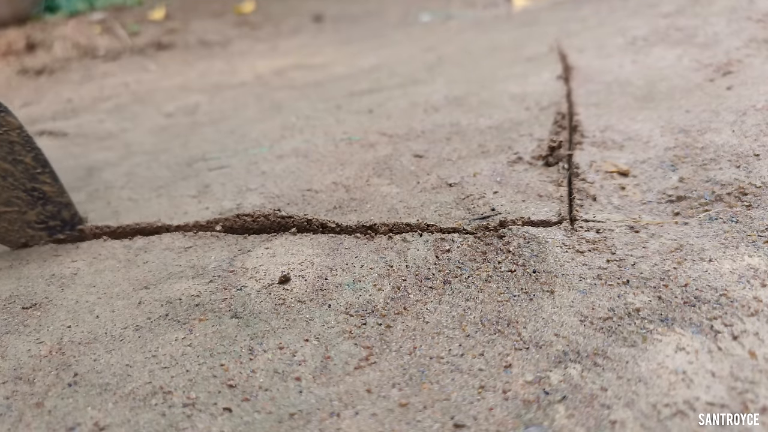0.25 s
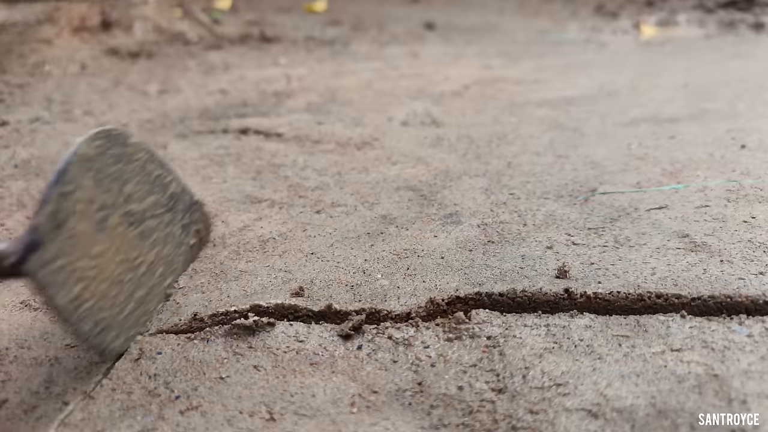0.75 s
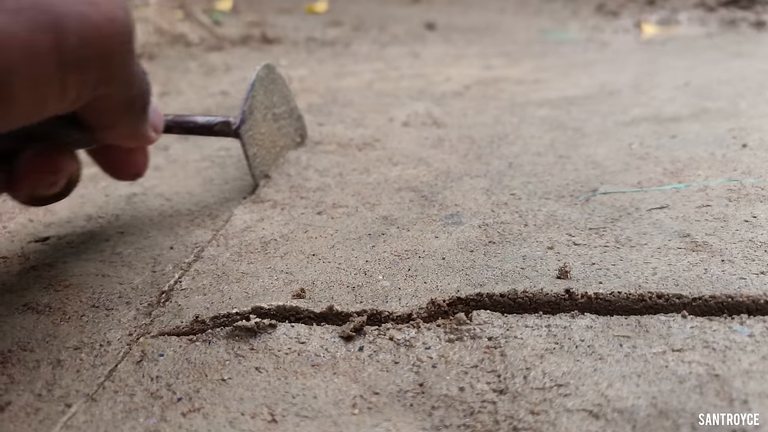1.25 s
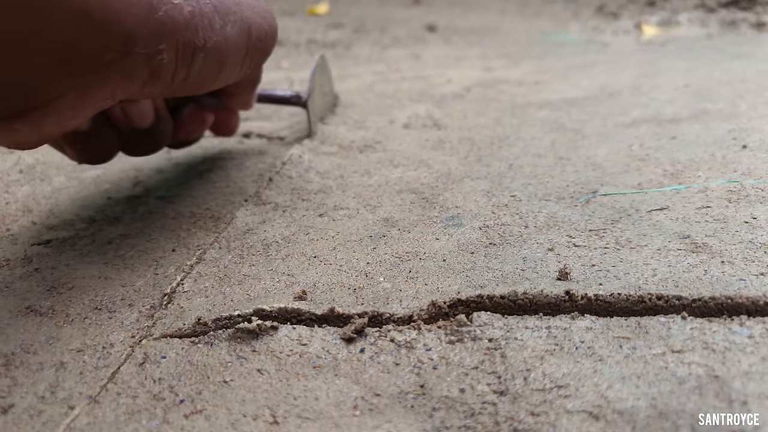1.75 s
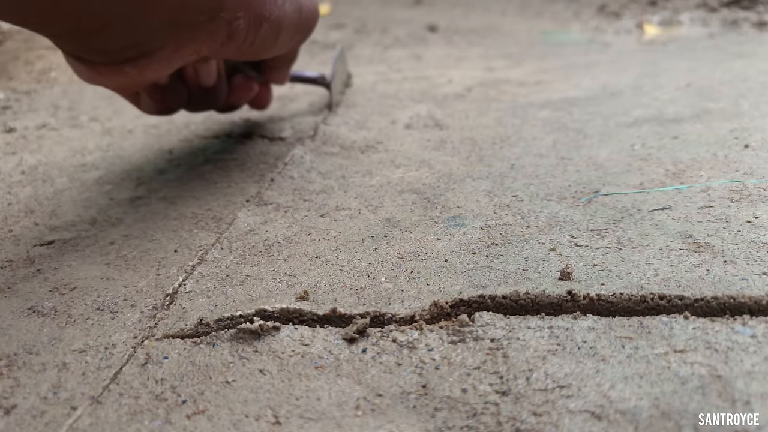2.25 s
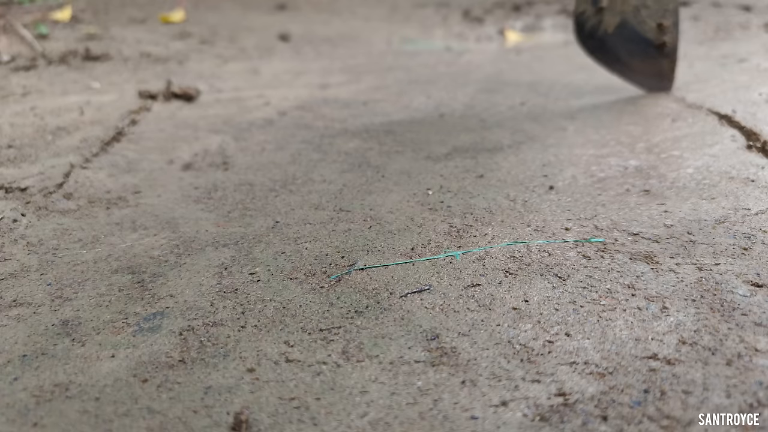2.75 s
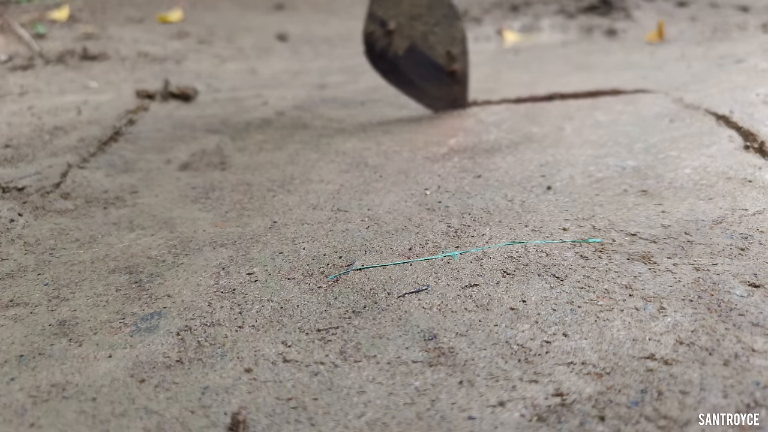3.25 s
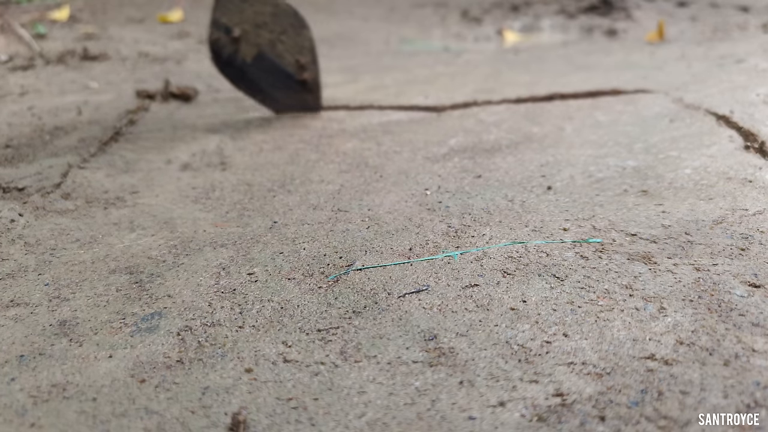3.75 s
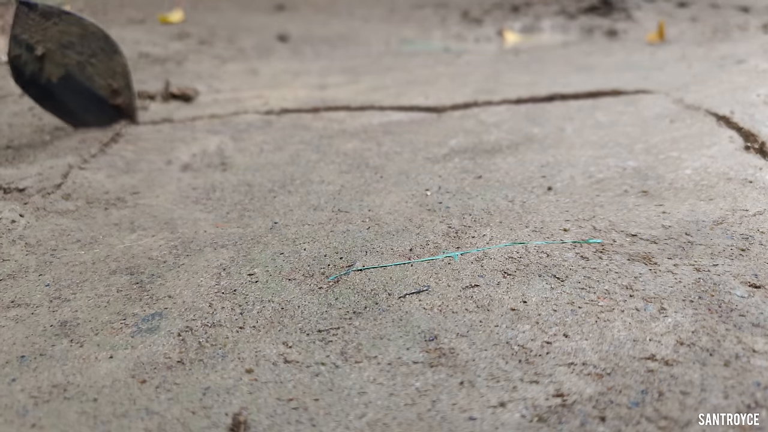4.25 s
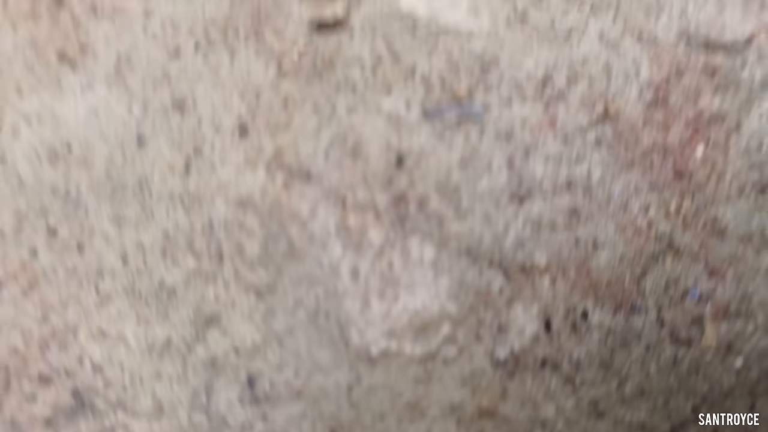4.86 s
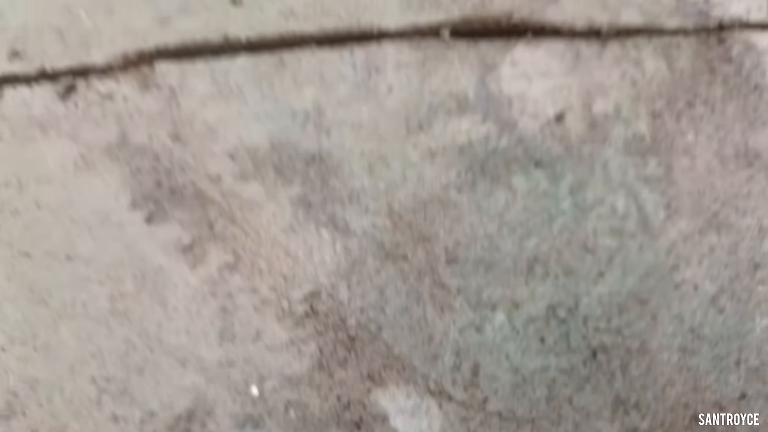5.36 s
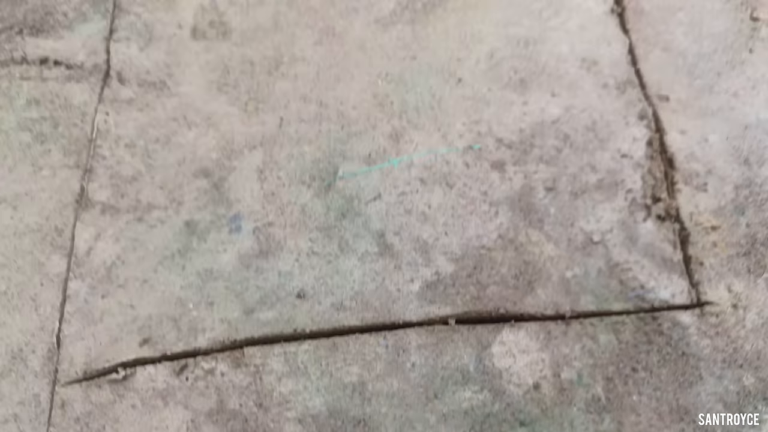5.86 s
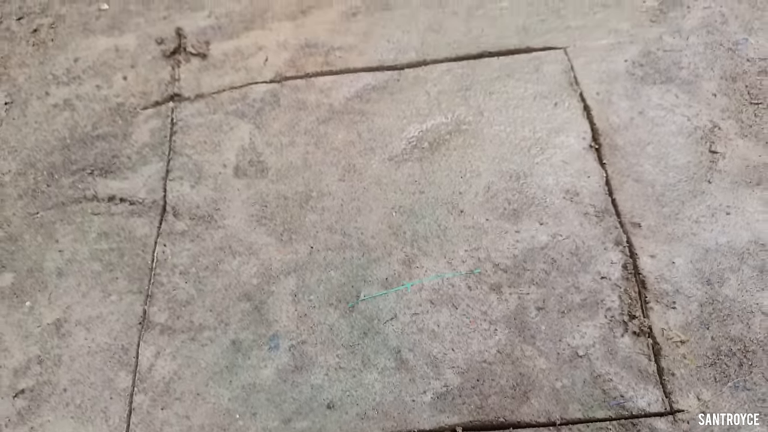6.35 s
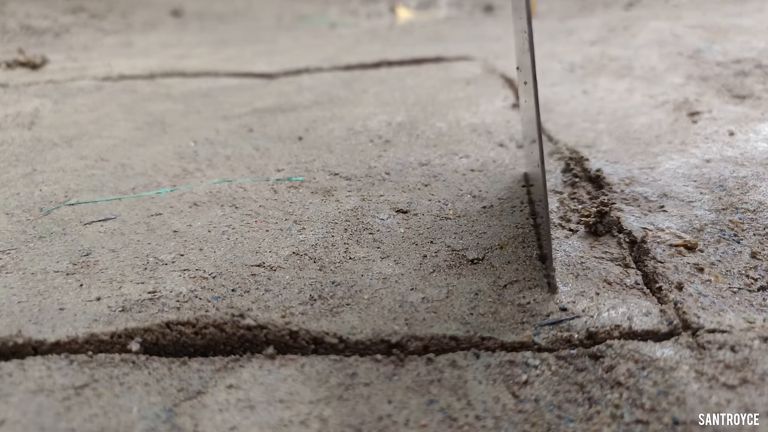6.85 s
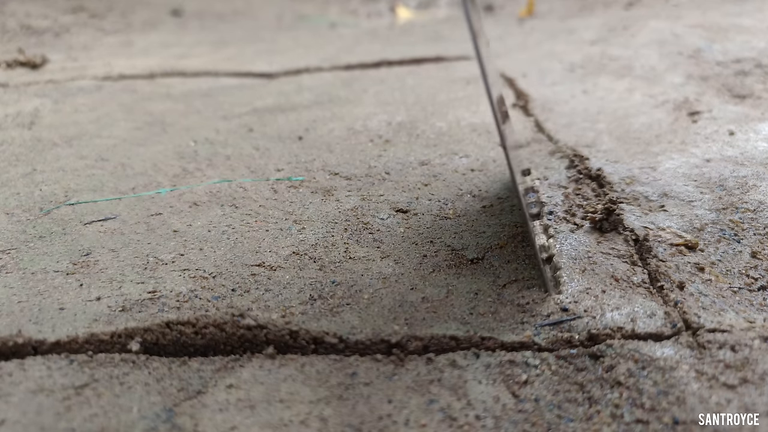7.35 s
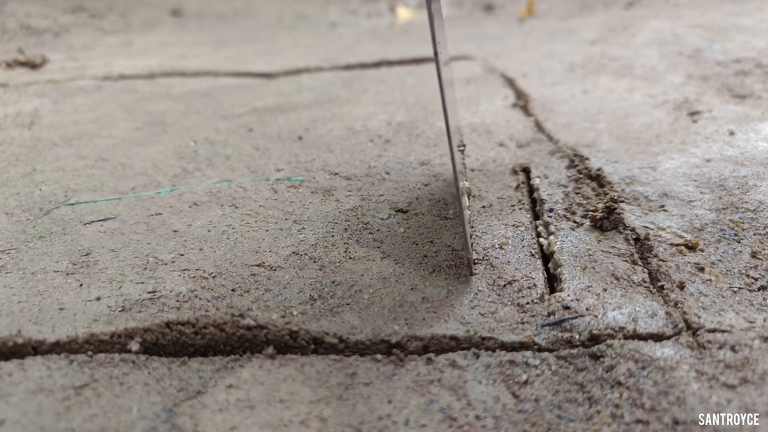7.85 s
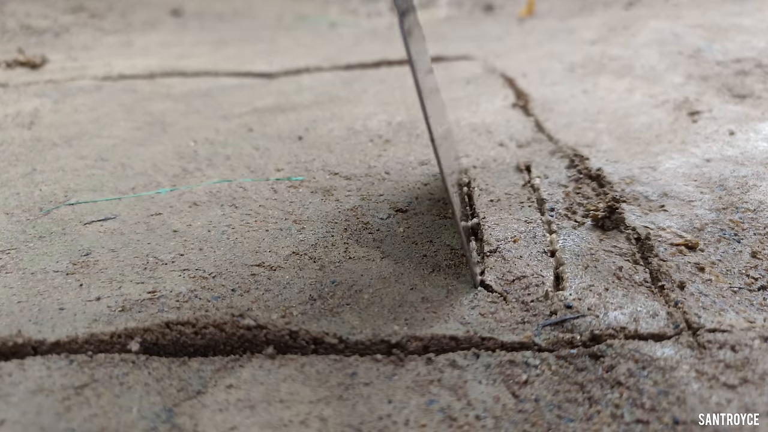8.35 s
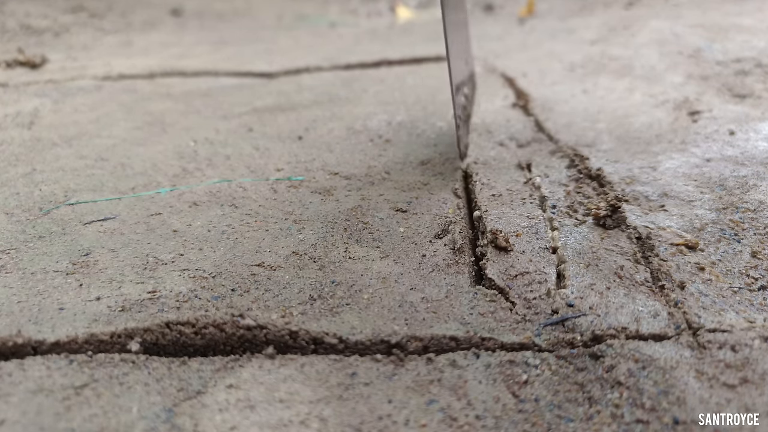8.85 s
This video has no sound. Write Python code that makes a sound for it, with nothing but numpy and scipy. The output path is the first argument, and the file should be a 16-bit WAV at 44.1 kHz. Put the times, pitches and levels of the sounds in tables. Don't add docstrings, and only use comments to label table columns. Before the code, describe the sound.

Steel blade drags gritty cuts through damp sand, pebbles snapping, then a knife taps crunchily while a songbird buzzes and trills.

```python
import sys
import numpy as np
from scipy import signal
from scipy.fft import rfft, irfft
from scipy.io import wavfile
from scipy.ndimage import uniform_filter1d, map_coordinates

SR = 44100
rng = np.random.default_rng(int(sys.argv[2]) if len(sys.argv) > 2 else 0)


def magnitude_from_level(level_db):
    exponent = np.asarray(level_db, float) / 20
    return 10 ** exponent


def master(y):
    cut = np.clip(np.atleast_2d(y).T, -1, 1)
    pcm = np.round(cut * 32767)
    wavfile.write(sys.argv[1], SR, pcm.astype(np.int16))


N = 401310
T = np.arange(N) / SR
HZ = np.fft.rfftfreq(N, 1 / SR)
SIDES = np.array([[.5], [-.5]])

# frequency in Hz, density in dB per Hz.
YARD_COLOUR = [(15, -45.5), (25, -11.5), (81, 4), (170, -4), (248, 2), (292, -6.5), (345, -8), (637, -14),
               (763, -6.5), (900, -27), (1170, -46), (1980, -120)]
# frequency in Hz, density in dB per Hz.
GARDEN_COLOUR = [(15, -27.5), (25, -4), (38, -19.5), (114, -4), (181, -4), (324, -1.5), (692, -8.5),
                 (766, -12), (1040, -15.5), (3250, -21), (4300, -16), (5260, -22.5), (7130, -18),
                 (8300, -24.5), (10700, -28.5), (13900, -63.5), (22000, -120)]
# time in seconds, level
# in dB.
INSECT_CHOIR = [(4.51, -56.5), (4.86, -32.5), (6.89, -40.5), (7.46, -39.5), (8.2, -23), (8.75, -40),
                (9.03, -61)]
# last pulse in seconds, number of pulses, level in dB.
CRICKET_CHIRPS = [(4.51, 1, -33), (6.4093, 3, -32), (6.8037, 3, -33), (6.99, 2, -33.5), (7.233, 2, -36.5),
                  (7.4759, 3, -33.5)]
# start in seconds, length in seconds, pitch in Hz, level in dB.
HELD_WHISTLES = [(7.17, .125, 1950, -48), (7.29, .06, 2010, -48), (7.36, .19, 1980, -46.5),
                 (7.555, .055, 1980, -50), (6.33, .29, 1700, -54.5), (7.925, .016, 1000, -45),
                 (8.162, .016, 1000, -47), (8.455, .016, 1000, -46), (8.778, .016, 950, -45)]
# start in seconds, length in seconds, top pitch in Hz, level in dB.
RISING_WHISTLES = [(7.055, .08, 2400, -53), (7.675, .08, 2350, -50), (7.982, .08, 2380, -51),
                   (8.28, .078, 2350, -52), (8.555, .123, 3300, -46.5), (8.795, .118, 3300, -48.5)]
# time in seconds, level in dB, centre pitch in Hz.
BIRD_BUZZ = [
    (4.585, -49, 4720),
    (4.804, -14.5, 4700),
    (4.897, -10, 4736),
    (5.017, -11, 4734),
    (5.049, -37, 4750),
]
# time in milliseconds, pitch in Hz, level in dB.
SWOOP_NOTES = [
    [(-8, 5250, -36), (-.5, 5760, -16), (4, 5910, -18.5), (8, 5980, -31)],
    [(12.5, 4300, -30), (14.5, 4040, -15.5), (19, 3640, -10), (25, 3350, -14), (30, 3230, -18),
     (35, 3150, -22), (45, 2860, -35), (58, 2540, -38), (74, 2420, -43)],
    [(74, 2420, -43), (83, 2720, -37), (88, 3180, -27), (93, 3420, -18), (103, 3730, -10.5),
     (113, 3930, -12.5), (119, 4130, -8.5), (129, 4620, -7), (137, 4990, -11.5), (140.5, 5100, -32)],
]
# time in milliseconds, pitch in Hz, level in dB.
CHIP_NOTES = [
    [(-13, 3300, -38), (-8, 3540, -19), (-3, 3620, -14), (1, 3500, -12), (6, 2880, -36)],
    [(3.5, 4050, -30), (6, 4180, -15), (12, 4440, -10.5), (19, 4830, -6.5), (22.5, 5350, -15),
     (25, 5650, -21), (30, 5800, -30)],
    [(24, 4550, -30), (28, 4280, -12), (32, 4170, -7.5), (39, 4060, -10), (44, 3970, -18), (50, 3970, -16),
     (57, 4040, -19), (63, 4060, -36)],
    [(81, 7170, -40), (85, 7110, -26), (89, 7060, -21), (92, 6900, -25), (95, 6680, -42)],
]
# start in seconds, pace as a factor, effort in dB,
# gain from note to note in dB, lateness of the last note in milliseconds.
FIRST_TRILL = [(5.085, 0.99, -4.5, 1.5, .4), (5.26, 0.99, 0.1, -0.1, 1.4), (5.442, .99, 2.5, -1.5, -3.5),
               (5.619, 0.99, -2, 0.5, -1.5), (5.802, 0.98, -1, 0.65, -2.5), (5.987, .99, 1.5, -2, -5)]
# seconds, factor, dB, dB, milliseconds.
SECOND_TRILL = [(7.6345, 1, -9.5, 1.6, -3), (7.7752, 0.98, -1, 0.44, 1.5), (7.9146, 1.01, 0.5, -0.11, -.4),
                (8.055, 1, 1.6, -0.93, -.3), (8.1953, 1.02, 2.5, -1.15, -1.6),
                (8.3363, 1.006, 1.8, -0.75, 0), (8.478, 1.04, -0.4, -0.17, -0.5),
                (8.6208, 1.04, 0.2, -1.3, 3.5), (8.7711, 1.07, -2, -0.86, -1)]
# time in seconds, fine grit level in dB.
STROKE_PRESSURE = [
    [(0.0, -37.5), (0.116, -44.5), (0.41, -43), (0.46, -40), (0.664, -37), (0.716, -45)],
    [(0.73, -53.5), (0.83, -29), (0.986, -40), (1.216, -41.5), (1.302, -37.5), (1.804, -42), (2.212, -47.5),
     (2.518, -44.5), (2.533, -54)],
    [(2.87, -66.5), (2.96, -40.5), (3.337, -41), (3.649, -42.5), (3.691, -50), (3.905, -37.5), (4.061, -43),
     (4.389, -40), (4.41, -68)],
]
# coarse crunch in dB, blade body in dB (both relative to fine grit),
# drift of both along the stroke in dB, left minus right at the start in dB, the same at the end in dB.
STROKE_BALANCE = [
    (-10.5, -30.5, -3.5, 6.6, 5),
    (-7.5, -23.5, -2.5, 11.3, -2.5),
    (-6.5, -17, -9, 2.6, 2),
]
STROKE_BRIGHTEN = [0.19, 0.4, 0.14]
# frequency in Hz, density in dB per Hz.
STROKE_GRIT = [
    [(530, -40), (900, -25), (991, -28), (1200, -16), (1410, -29), (1770, -24), (2090, -26.5), (3070, -9),
     (4980, -20), (5890, -20.5), (10900, -3.5), (11800, -1.5), (16000, -10.5)],
    [(530, -29), (900, -27.5), (1460, -30.5), (1600, -26), (2330, -19.5), (3040, -17.5), (3910, -21),
     (6640, -11), (11000, -4), (12000, -2.5), (13800, -5), (15100, -1.5), (16000, -10.5)],
    [(530, -30), (900, -31.5), (1230, -15.5), (2500, -17), (3150, -7), (3770, -13.5), (5350, -18),
     (5890, -12), (6890, -15.5), (8250, -5.5), (10400, -7.5), (12000, -0.5), (16000, -10)],
]
# frequency in Hz, width in Hz, boost in dB.
PORT_PEAKS = [(8440, 1600, 2.5), (11980, 610, 7.5), (15400, 870, 7)]
# frequency in Hz, side minus mid in dB.
GRIT_WIDTH = [(60, -7), (110, -9), (200, -9), (380, -4), (700, 3.5), (1290, 4.5), (2380, -2.5),
              (4400, -2.5), (8120, 4.5), (15000, -1.5)]
# frequency in Hz, share to the left as a fraction.
GRIT_LEAN = [(100, 0.01), (300, -0.38), (1000, 0.012), (2400, -0.32), (4400, 0.01), (8000, -0.022),
             (12000, 0.67), (15000, 0.67)]
# from in Hz, to in Hz, peak in seconds,
# width in seconds, level in dB.
BLADE_TILTS = [(11300, 12700, 0.83, .035, 3.5), (8850, 11800, 1.84, 0.38, 0), (2930, 3450, 3.08, .2, -3),
               (2120, 2900, 0.805, 0.051, 5), (2180, 3330, 1.56, .45, -8), (8000, 9000, 3.55, .15, -0.5)]
# from in seconds, to in seconds, level in dB.
BLADE_RESTS = [
    (2.543, 2.878, -69.5),
    (4.406, 4.445, -62),
]
# peak in seconds, fine grit in dB, rise in seconds, fall in seconds.
KNIFE_RUBS = [(6.602, -70, .15, .05), (6.915, -65, .02, .01), (7.15, -68, .06, .01),
              (7.34, -67.5, .05, .01), (7.5, -57.5, .12, .1), (7.545, -49, .012, 0.11),
              (7.576, -49.5, 0.066, 0.02), (7.655, -54.5, .03, .07), (7.893, -43.5, .02, .025),
              (8.104, -62.5, 0.057, .01), (8.31, -60, .035, 0.009), (8.5, -56, 0.1, 0.23),
              (8.63, -48, 0.017, 0.084), (8.675, -60, .1, .02), (9.045, -64.5, 0.2, 0.11)]
# time in seconds, peak in dB, crunch in relative dB.
PEBBLE_SNAPS = [(0.2578, -26, -29), (0.2748, -32, -23), (0.347, -33.5, -18), (0.415, -27.5, -22),
                (0.5317, -37.5, -13), (0.7633, -32.5, -20), (0.7796, -36, -14), (0.798, -25.5, -12),
                (0.8185, -26, -16), (0.612, -26, -25), (0.837, -19.5, -23), (1.068, -35.5, -20),
                (1.243, -37, -17), (1.2933, -31.5, -21), (1.722, -30, -30), (1.731, -31, -30),
                (1.766, -30, -32), (1.821, -32, -30), (1.89, -34, -23), (3.21, -31, -20), (3.527, -35, -22),
                (1.759, -25, -43), (1.811, -24.5, -37), (2.6, -59, -8), (2.795, -52, -19),
                (2.9238, -34, -36), (3.014, -31.5, -14), (3.0854, -33.5, -1), (3.3438, -42, -14),
                (3.3752, -42, -19), (3.8277, -27, -26.5), (3.907, -26, -27.5), (4.14, -30, -30),
                (4.3086, -43, -19), (7.4806, -43, -23), (7.6453, -46, -20), (7.8914, -37, -20),
                (8.4856, -44, -8), (8.5226, -44.5, -17), (8.5954, -47, -20)]
# start in seconds, grit in dB, crunch in relative dB, body in relative dB,
# length in milliseconds.
CRUMBLING_CLODS = [(.6, -34.5, -25, -32, 22), (0.734, -40.5, -12, -26, 6.6), (.765, -53.5, 7.5, -13, 125),
                   (1.706, -30.5, -33, -35, 9.2), (2.879, -49, -17, -15, 22), (3.135, -38, -12, -20, 11),
                   (3.425, -30, -10.5, -16.5, 16)]
# start in seconds, length in milliseconds, pitch in Hz, level in dB.
STEEL_SQUEAKS = [(7.567, 14, 15300, -38), (7.558, 24, 12500, -43), (7.578, 12, 11350, -44),
                 (8.625, 30, 13800, -48.5), (8.63, 25, 11350, -53), (8.645, 18, 15450, -53)]
# time in seconds, extra path
SAND_BOUNCE = [(.7, 4.7), (.8, 2.95), (1.4, 2.53), (2.5, 3.2), (3.5, 3.98), (4.4, 8.1)]
# time in seconds, grit peak in dB, thud in relative dB,
# shatter length in milliseconds, crunch in relative dB.
KNIFE_TAPS = [
    (6.927, -8, -13.5, 11, -5),
    (7.1613, -2, -6.5, 13, 0),
    (7.3488, 0, -5, 6.7, 0.5),
    (8.1125, 0, -7, 14, 3),
    (8.318, -2, -2, 6.8, -4),
    (9.0472, -27, -26, 12, -12),
]
# frequency in Hz, width in Hz, level in dB.
TAP_RINGS = [
    [(416, 110, 0), (715, 140, -2), (970, 110, -4.5), (1880, 120, -8), (2940, 270, 3), (5200, 220, -2),
     (5950, 430, 4.5)],
    [(270, 90, -9.5), (453, 99, 0.5), (674, 81, -3), (1040, 88, -8), (1843, 120, -3), (2610, 150, -8),
     (3240, 150, -8.5), (4930, 180, -9)],
    [(448, 170, -1), (1000, 130, -6.5), (1410, 210, -15), (1874, 200, -11), (2785, 130, -10),
     (3070, 140, -9), (3750, 160, -17), (5200, 200, -22.5)],
    [(295, 110, -2.5), (446, 67, -9), (664, 80, -7), (1132, 130, -1.5), (1288, 150, -2.5),
     (2220, 270, -4.5), (2740, 390, 3.5)],
    [(520, 170, 2.5), (675, 88, -5.5), (1060, 130, -11), (1694, 90, -17.5), (2300, 130, -8),
     (2684, 200, -8.5), (3210, 88, -5)],
    [(280, 51, 5), (1250, 150, -4.5), (1800, 150, -11), (3700, 120, -5)],
]
# frequency in Hz, left minus right in dB.
TAP_RING_PAN = [(400, -3.5), (700, 0), (1000, -6.5), (1400, -8), (1900, -.5), (6000, -0.5)]


def unit(x):
    return x / np.sqrt(np.mean(x ** 2))


def on_hz(points):
    hz, value = np.transpose(points)
    return np.interp(np.log(HZ + 1), np.log(hz), value)


def band(x, lo_hz, hi_hz):
    return signal.sosfilt(signal.butter(3, [lo_hz, min(hi_hz, SR * .45)], "band", fs=SR, output="sos"), x)


def walk(rate):
    k = int(SR / rate)
    held = np.repeat(rng.standard_normal(N // k + 1), k)
    return 1.276 * uniform_filter1d(uniform_filter1d(held, k), k)[:N]


def gain(s, db):
    return magnitude_from_level(np.interp(T, s, db, -200, -200))


def add(out, s, x):
    i = int(s * SR)
    out[..., i:i + x.shape[-1]] += x[..., :N - i]


def whistle(out, s, hz, db):
    t = np.arange(s[0], s[-1], 1 / SR)
    ends = np.clip(np.minimum(t - s[0], s[-1] - t) / .0015, 0, 1)
    phase = 2 * np.pi * np.cumsum(np.interp(t, s, hz)) / SR
    add(out, s[0], np.sqrt(2) * ends * magnitude_from_level(np.interp(t, s, db)) * np.sin(phase))


def dove():
    coo_hz, peak_s, peak_db = 234, 2.372, -37
    out = np.zeros(N)
    span = np.linspace(-.24, .11, num=12)
    fall_5db_s = np.where(span < 0, .085, .045)
    wavering = coo_hz + 3 * rng.standard_normal(12)
    whistle(out, peak_s + span, wavering, peak_db - 5 * np.abs(span / fall_5db_s) ** 1.83)
    whistle(out, [2.484, 2.528, 2.54], [coo_hz] * 3, -45 + np.array([-17, 0, -12]))
    throb = 1 + 0.36 * np.cos(2 * np.pi * 26 * (T - 2.366))
    return out * throb * magnitude_from_level(np.array([[-2.], [1.6]]))


def yard():
    mid, side = irfft(rfft(rng.standard_normal((2, N))) * magnitude_from_level(on_hz(YARD_COLOUR)), N)
    rumble_db = 5 * np.exp(-((T - 2.5) / 0.51) ** 2)
    air = np.array([mid + 0.43 * side, mid - 0.67 * side]) / mid.std()
    air = magnitude_from_level(-66 + rumble_db + 1.1 * walk(14)) * air
    air = air * ((T < .716) | (T > .73)) * ((T < 4.46) + .3 * (T > 6.4))
    shrill = unit(band(rng.standard_normal(N), 1580, 1880))
    insect = gain((0.41, 0.453, .716), -54 + np.array([-25, 0, -6])) * shrill
    return air + dove() + insect


def tree_echo():
    t60_s = 0.83
    t, (far, near) = T[:SR], rng.standard_normal((2, SR))
    haze = far * magnitude_from_level(-60 * t / t60_s) * (t > .012)
    ground = near * np.exp(-t / 0.025) * (t > .002)
    trees = magnitude_from_level(-15.5) * haze / np.linalg.norm(haze) + magnitude_from_level(-18) * ground / np.linalg.norm(ground)
    trees[int(0.01 * SR)] += magnitude_from_level(-15.5)
    return trees


def bird_buzz():
    rate_hz, swing_hz = 160, 206
    s, db, hz = np.transpose(BIRD_BUZZ)
    wobble = np.sin(2 * np.pi * np.cumsum(rate_hz * (1 + .075 * walk(45))) / SR)
    centre = np.interp(T, s, hz) + 22 * walk(25) + 30 * walk(250)
    effort = np.interp(T, s, np.clip(1.2 + db / 70, .62, 1))
    pitch = centre + swing_hz * wobble * (1 + .1 * walk(90)) * effort
    level = np.sqrt(2) * gain(s, db) * magnitude_from_level(2.2 * wobble + 0.41 * walk(200))
    buzz = level * np.sin(2 * np.pi * np.cumsum(pitch) / SR)
    return signal.sosfiltfilt(signal.butter(2, [3900, 5700], "band", fs=SR, output="sos"), buzz)


def songbird():
    song_ends_s = 8.85
    song = bird_buzz()
    for notes, syllables in ((SWOOP_NOTES, FIRST_TRILL), (CHIP_NOTES, SECOND_TRILL)):
        for start, pace, effort_db, step_db, late_ms in syllables:
            for k, note in enumerate(notes):
                ms, hz, db = np.transpose(note)
                if start + ms[0] / 1000 >= song_ends_s:
                    continue
                s = start + (pace * ms + late_ms * (note is notes[-1])) / 1000
                detune = 1 + .004 * rng.standard_normal()
                level_db = db + effort_db + k * step_db + .9 * rng.standard_normal(len(db))
                whistle(song, s, hz * detune, level_db)
    to_trees = magnitude_from_level(1.5) * band(song, 3300, 12000) + .5 * band(song, 5000, 6300)
    return band(song + signal.fftconvolve(to_trees, tree_echo())[:N], 1500, 9000)


def garden_air():
    low, high = rng.standard_normal((2, N))
    air = unit(irfft(rfft(low) * magnitude_from_level(on_hz(GARDEN_COLOUR)) * (HZ < 10750), N)) * magnitude_from_level(0.86 * walk(2.557))
    top = (HZ > 11400) * (HZ < 13600) * magnitude_from_level(-(HZ - 11400) / 250)
    air = air + magnitude_from_level(-29.0) * unit(irfft(rfft(high) * top, N))
    hum = magnitude_from_level(-10) * np.sin(2 * np.pi * np.cumsum(120 + 6 * walk(30)) / SR)
    return magnitude_from_level(-37.5) * (air + hum)


def insects():
    low, high = rng.standard_normal((2, N))
    when, choir_db = np.transpose(INSECT_CHOIR)
    out = gain(when, choir_db - 10.0) * unit(band(low, 4000, 4550))
    out += gain(when, choir_db - 17.5) * unit(band(high, 6050, 7320))
    gap_s, slowing_s, growth_db = .0275, .0025, 2.3
    for last, pulses, db in CRICKET_CHIRPS:
        for k in range(pulses):
            at = last - k * (gap_s - (k - 1) * slowing_s)
            pulse_db = db - k * growth_db + np.array([-5, -2.5, -18])
            whistle(out, at + np.array([-.002, .006, .019]), [4540, 4120, 4050], pulse_db)
    return out


def far_whistlers():
    out, u = np.zeros(N), np.linspace(0, 1, num=13)
    for s, length, hz, db in HELD_WHISTLES:
        pitch = hz * (1 + 0.0093 * rng.standard_normal(13))
        whistle(out, s + length * u, pitch, db + 1.5 - 6 * u ** 6 + 2.5 * rng.standard_normal(13))
    from_hz, bend = 1590, 2.3
    for s, length, hz, db in RISING_WHISTLES:
        pitch = from_hz + (hz - from_hz) * u ** bend
        shape_db = np.interp(u, [0, .82, 1], [-5, 0, -1.5])
        whistle(out, s + length * u, pitch, db + shape_db + 3 * rng.standard_normal(13))
    return out


def gust_offset():
    lurch_s, sway_hz = 4.86, 5.65
    laid = np.interp(T, [4.505, 4.512, 8.7, 9.03], [0, 1, 1, 0])
    lurch = np.exp(-np.abs((T - lurch_s) / np.where(T < lurch_s, .04, .16)) ** 1.5)
    sway = np.interp(T, (5.1, 5.3, 6.05, 6.3), [0, 1, 1, 0]) * np.cos(2 * np.pi * sway_hz * (T - 5.63))
    return .014 * laid + .035 * lurch + .019 * sway


def garden():
    fade = gain([4.505, 8.9, 9.035], [0, 0, -19.5])
    out = garden_air() + insects() + far_whistlers() + songbird()
    whistle(out, [6.508, 6.514, 6.53, 6.56], [190, 142, 93.6, 70], [-63, -19.5, -41, -43])
    return fade * out + gust_offset()


def grit(colour):
    grains = rng.standard_normal((2, N)) * magnitude_from_level(1.5 * rng.exponential(size=N) + 1.2 * walk(160))
    ports_db = sum(db / (1 + (2 * (HZ - hz) / width) ** 2) for hz, width, db in PORT_PEAKS)
    same, other = rfft(grains) * magnitude_from_level(on_hz(colour) + ports_db)
    lean = np.clip(on_hz(GRIT_LEAN), -.8, .8)
    out_of_step = .7j * same + 0.43 * other
    return same, magnitude_from_level(on_hz(GRIT_WIDTH)) * (lean * same + np.sqrt(1 - lean ** 2) * out_of_step)


def layer(spectra, lo_hz, hi_hz, patchy_db):
    mid, side = (irfft(s * (HZ >= lo_hz) * (HZ < hi_hz), N) for s in spectra)
    return np.array([mid + side, mid - side]) / np.sqrt(np.mean(mid ** 2)) * magnitude_from_level(patchy_db * walk(29.94))


def strokes():
    out = np.zeros((2, N))
    pan_settle = 0.1
    edge_on = 0.54
    for table, balance, colour, brighten in zip(STROKE_PRESSURE, STROKE_BALANCE, STROKE_GRIT, STROKE_BRIGHTEN):
        coarse_db, body_db, drift_db, from_db, to_db = balance
        s, press_db = np.transpose(table)
        along = np.clip((T - s[0]) / (s[-1] - s[0]), 0, 1)
        dull = magnitude_from_level(drift_db * along - brighten * (np.interp(T, s, press_db) + 41.5))
        pan_db = to_db + (from_db - to_db) / (1 + (along / pan_settle) ** 4)
        sand = grit(colour)
        fine = layer(sand, 6500, 15800, patchy_db=1.1)
        coarse = layer(sand, 2000, 6500, patchy_db=1)
        body = layer(sand, 450, 2000, patchy_db=1)
        for lo_hz, hi_hz, at, width, db in BLADE_TILTS:
            if s[0] < at < s[-1]:
                beam = magnitude_from_level(db) * np.exp(-((T - at) / width) ** 2)
                fine = fine + beam * band(fine, lo_hz, hi_hz)
                coarse = coarse + beam * band(coarse, lo_hz, hi_hz)
        body_gain = magnitude_from_level(body_db - edge_on * (pan_db - to_db))
        crunch = dull * (magnitude_from_level(coarse_db) * coarse + body_gain * body)
        out += gain(s, press_db) * (fine * magnitude_from_level(SIDES * (pan_db - 5.0)) + crunch)
    return out, fine, coarse, body


def squeaks():
    out = np.zeros((2, N))
    for s, ms, hz, db in STEEL_SQUEAKS:
        steel = unit(band(rng.standard_normal(2000), hz - 180, hz + 180))[:int(ms * SR / 1000)]
        add(out, s, magnitude_from_level(db) * steel * np.hanning(len(steel)))
    return out


def cutting():
    out, fine, coarse, body = strokes()
    for start, end, db in BLADE_RESTS:
        soft_grit = fine + magnitude_from_level(-9) * coarse + magnitude_from_level(-15) * body
        out += gain([start, end], [db, db]) * magnitude_from_level(2.8 * walk(25.16)) * soft_grit
    for s, db, rise, fall in KNIFE_RUBS:
        swell = gain([s - rise, s, s + fall], [db - 34.5, db, db - 34.5])
        out += swell * (magnitude_from_level(3.5) * fine + magnitude_from_level(-11.0) * coarse)
    t = T[:500]
    puff = np.exp(-t / 0.0082) * np.minimum(t / 0.0017, 1) * (1 - t / T[500])
    for s, db, coarse_db in PEBBLE_SNAPS:
        i = int(s * SR)
        crunch = magnitude_from_level(coarse_db + 7.5) * (coarse + magnitude_from_level(-17) * body)[:, i:i + 500]
        add(out, s - .001, magnitude_from_level(db - 6.0) * puff * (fine[:, i:i + 500] + crunch))
    for s, db, coarse_db, body_db, ms in CRUMBLING_CLODS:
        i, k = int(s * SR), int(ms * SR / 1000)
        crumble = np.sqrt(np.sin(np.pi * np.sqrt(np.arange(k) / k)).clip(0))
        lump = fine + magnitude_from_level(coarse_db) * coarse + magnitude_from_level(body_db) * body
        add(out, s, magnitude_from_level(db) * crumble * lump[:, i:i + k])
    return out + squeaks()


def bounce(x):
    late = np.arange(N) - SR * np.interp(T, *np.transpose(SAND_BOUNCE)) / (343 * 100)
    dull = signal.sosfiltfilt(signal.butter(2, 8000, fs=SR, output="sos"), x)
    echo = np.array([map_coordinates(port, [late], order=1) for port in dull])
    return x + np.clip(.52 + .15 * walk(25), 0, 1) * echo


def patches(x):
    hz, s, z = signal.stft(x, SR, nperseg=1024)
    cells = (len(hz) // 3 + 1, len(s) // 4 + 1)

    def spread(values):
        return np.kron(values, np.ones((3, 4)))[:len(hz), :len(s)]

    notch_hz = 343 * 100 / 2 / np.interp(s, *np.transpose(SAND_BOUNCE))
    octaves_off = np.log2((hz[:, None] + 1) / notch_hz)
    gap_share = .03 + .22 * np.exp(-(octaves_off / .2) ** 2)
    gap_share += .3 * np.outer((hz > 950) & (hz < 1700), s < .45)
    db = 2.2 * spread(rng.standard_normal(cells)) - 40 * (spread(rng.random(cells)) < gap_share)
    db = db * np.where(hz < 7800, 1, .3)[:, None] * (s < 4.45)
    tilt = uniform_filter1d(uniform_filter1d(rng.standard_normal(db.shape), size=30, axis=0), size=24, axis=1)
    db += 1.6 * unit(tilt) * np.outer(hz > 7000, s < 4.45)
    return signal.istft(z * magnitude_from_level(db), SR, nperseg=1024)[1][:, :N]


def tap_ring(out, tap, modes):
    s, db, thud_db, _, _ = tap
    left_lead_s, lead_top_hz = 0.00026, 810
    t = np.arange(6000) / SR
    for (hz, width, mode_db), (start, apart) in zip(modes, rng.standard_normal((len(modes), 2))):
        pan_db = np.interp(hz, *np.transpose(TAP_RING_PAN))
        lead = 2 * np.pi * min(hz, lead_top_hz) * left_lead_s + .65 * apart
        ring = np.sin(2 * np.pi * hz * t + .7 * start + lead * SIDES)
        swell = (1 - np.exp(-t / .0013)) ** 2 * np.exp(-np.pi * width * t)
        add(out, s - .0006, magnitude_from_level(db + thud_db + mode_db + SIDES * pan_db) * ring * swell / swell.max())


def tap_shatter(out, tap):
    s, db, _, ms, crunch_db = tap
    t = np.arange(6000) / SR
    grains = np.repeat(magnitude_from_level(2.2 * rng.exponential(size=len(t) // 20)), 20)
    noise = unit(rng.standard_normal((3, len(t))) * grains)
    decay = np.exp(-t / 0.0071) / (1 + (t / ms * 1000) ** 8) + magnitude_from_level(-37) * np.exp(-t / 0.014)
    shatter = np.minimum(t / 0.0017, 1) * decay
    lower = band(noise[[0, 2]] * shatter, 7650, 10900) * np.array([[.45], [-.8]])
    finest = band(noise[1:] * shatter, 11150, 15700) * np.array([[1.45], [.85]])
    crunch = magnitude_from_level(crunch_db) * band(noise[:2] * shatter * np.exp(-t / 0.016), 1500, 3900)
    crunch += magnitude_from_level(crunch_db - 5.5) * band(noise[1:] * shatter * np.exp(-t / .012), 3900, 7600)
    soft_grit = noise[:2, -300:] * np.linspace(0, 1, num=300) ** 2
    add(out, s - 300 / SR, magnitude_from_level(db - 16.5) * band(soft_grit, 900, 5200))
    add(out, s, magnitude_from_level(db - 1.9) * (lower + finest + crunch))


def taps():
    out = np.zeros((2, N))
    for tap, modes in zip(KNIFE_TAPS, TAP_RINGS):
        tap_ring(out, tap, modes)
        tap_shatter(out, tap)
    return out


def scene():
    return yard() + garden() + patches(bounce(cutting())) + taps()


def top_cut(x):
    return signal.sosfilt(signal.butter(12, 16240, fs=SR, output="sos"), x)


def record(dry):
    top = signal.ellip(8, .1, 60, 16300, fs=SR, output="sos")
    mix = np.clip(signal.sosfiltfilt(top, np.clip(dry, -1, 1)), -1, 1)
    return top_cut(mix)


dry = scene()
out = record(dry)
master(out)
```